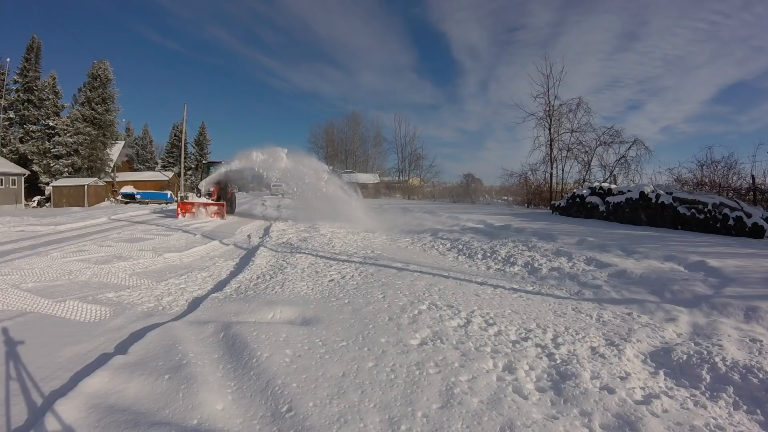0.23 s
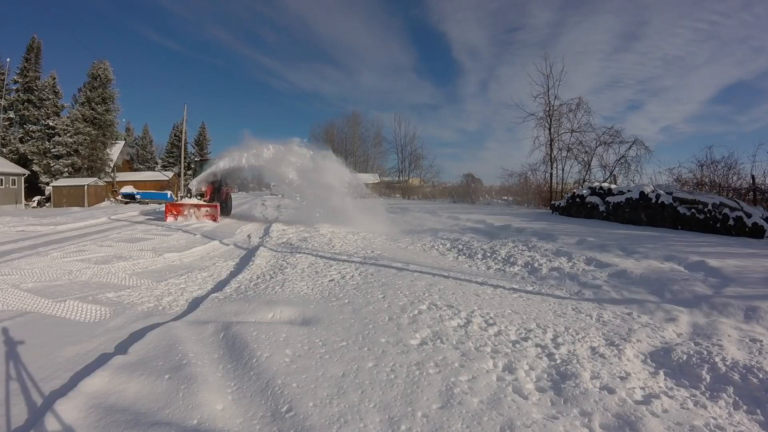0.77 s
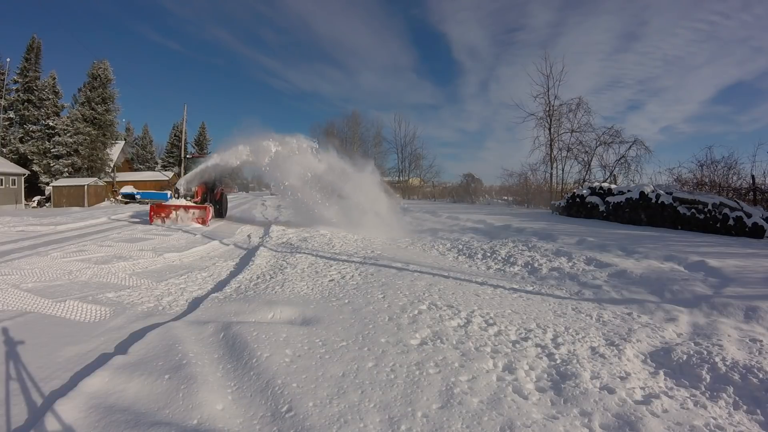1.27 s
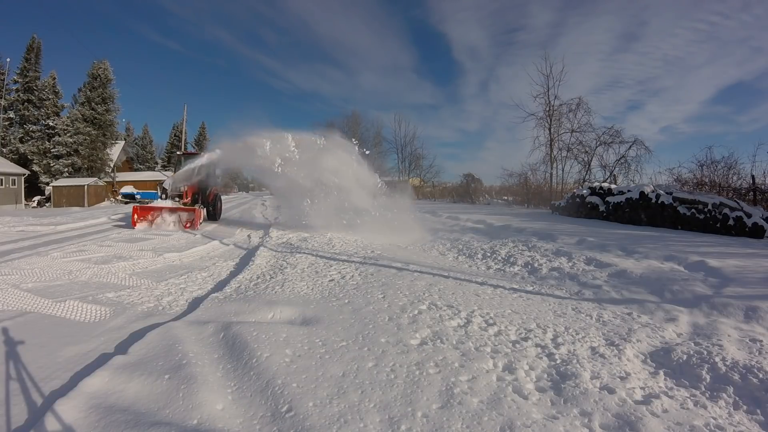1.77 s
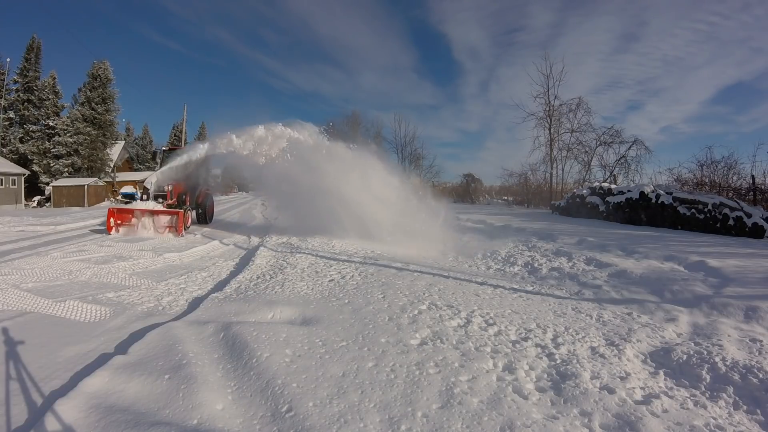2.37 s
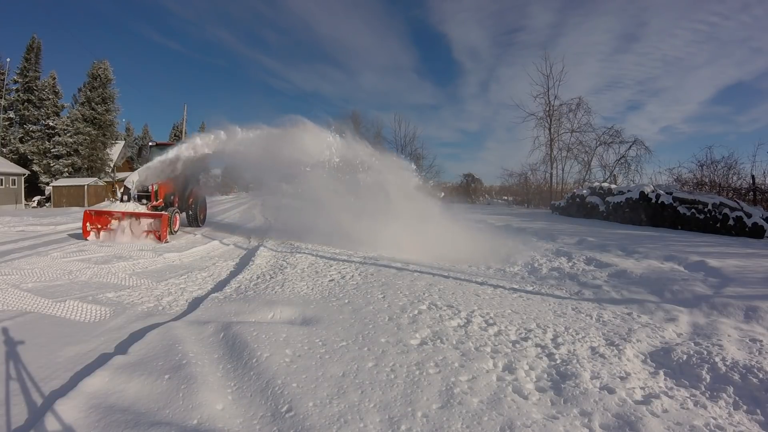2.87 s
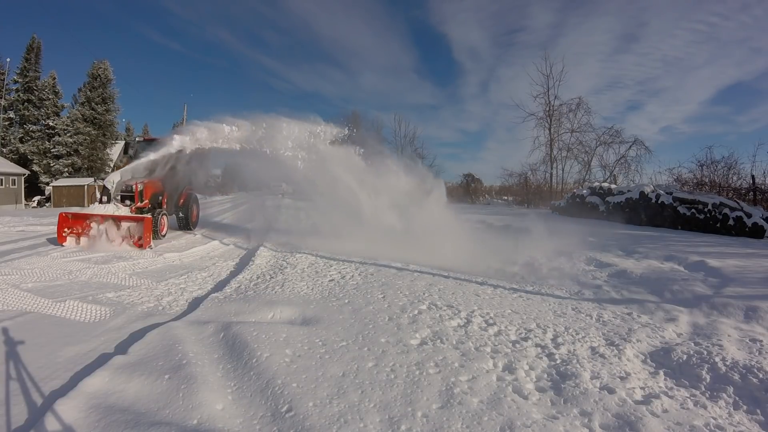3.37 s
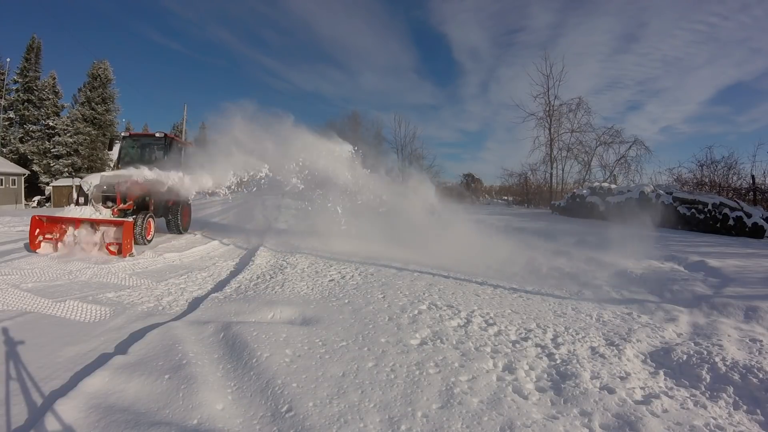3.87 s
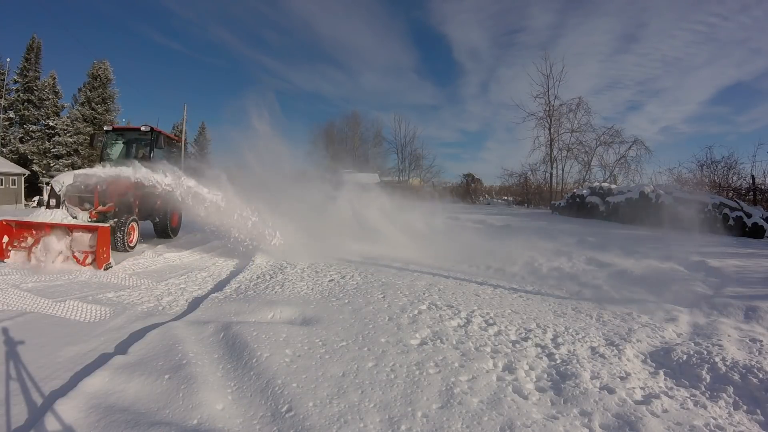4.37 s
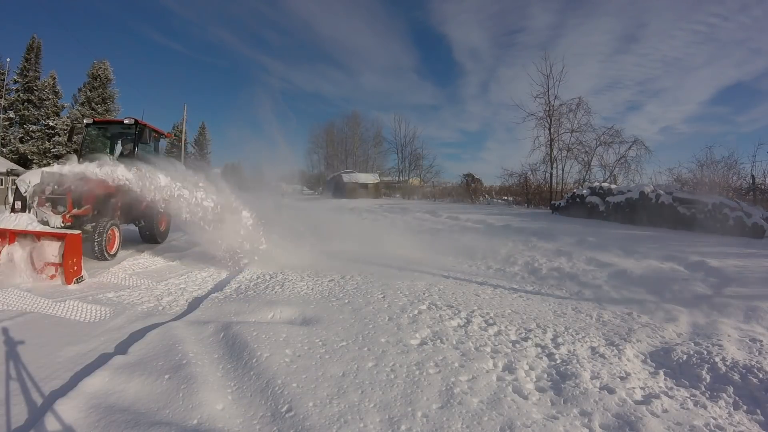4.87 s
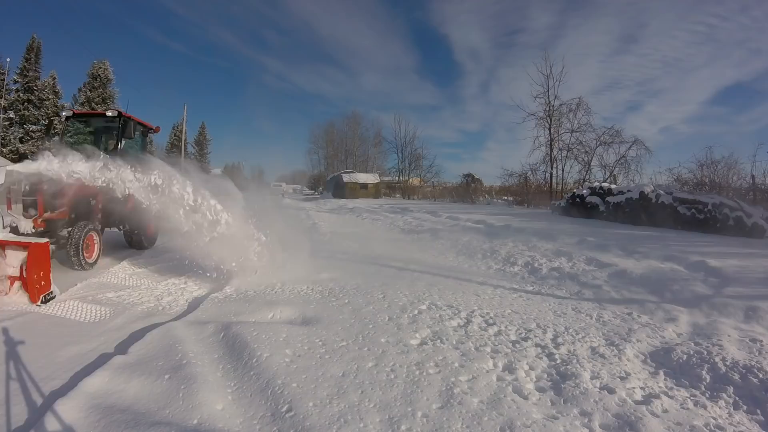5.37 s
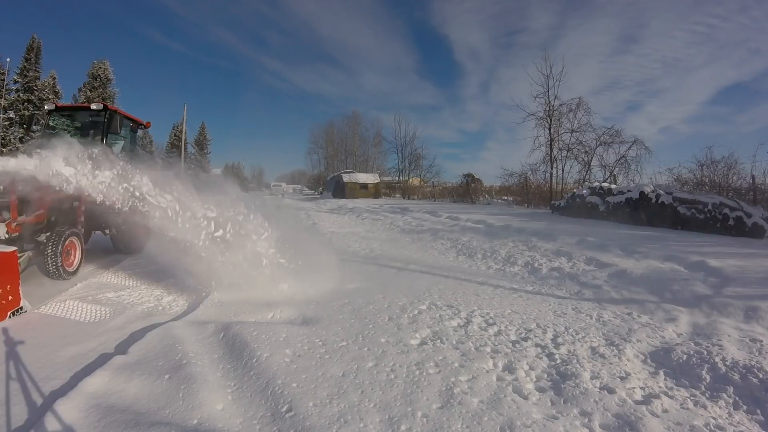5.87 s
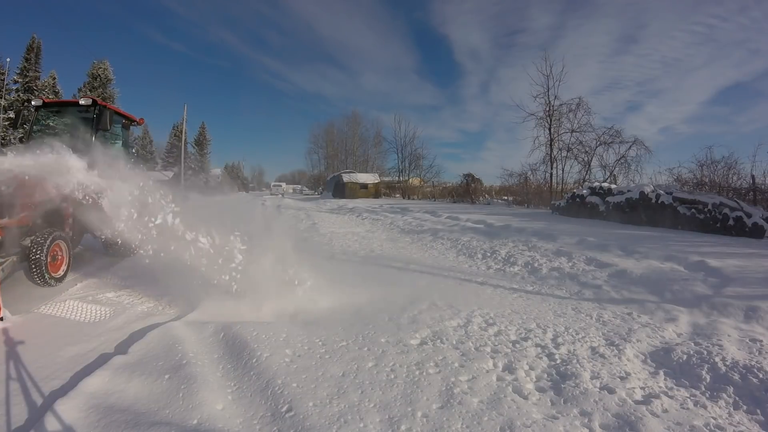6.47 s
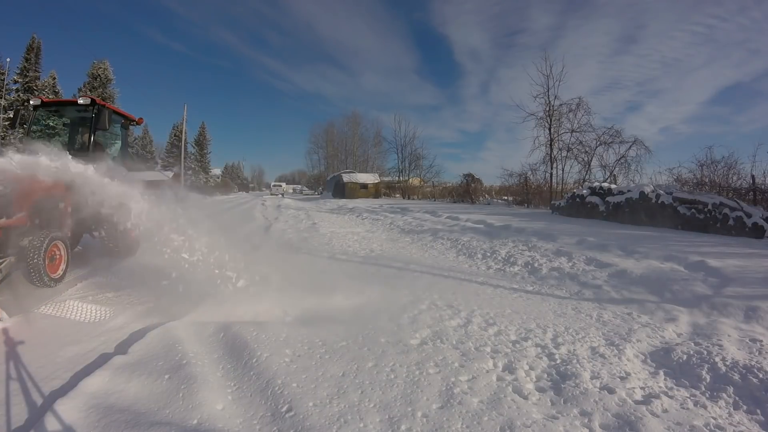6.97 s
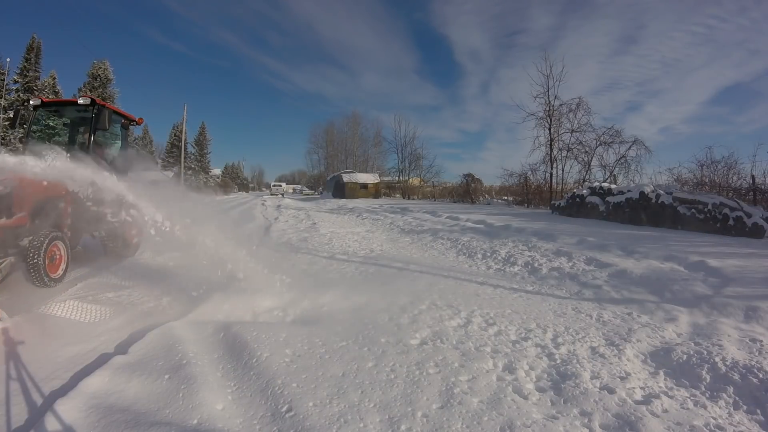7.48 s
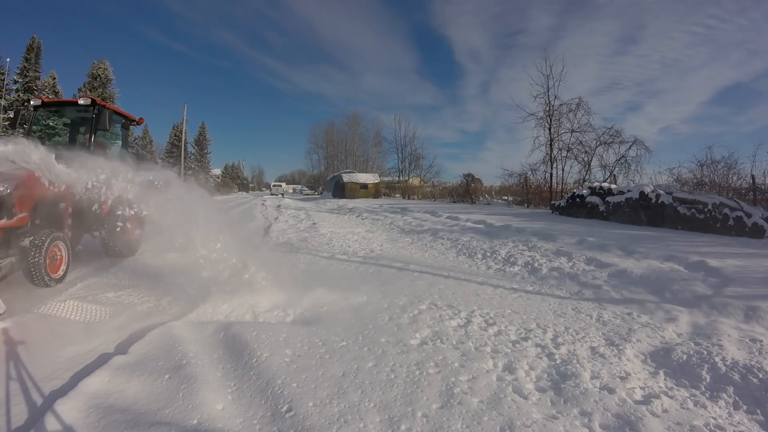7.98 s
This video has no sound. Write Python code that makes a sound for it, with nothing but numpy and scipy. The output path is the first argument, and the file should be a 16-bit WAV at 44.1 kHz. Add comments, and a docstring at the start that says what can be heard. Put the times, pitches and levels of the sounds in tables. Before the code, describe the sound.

A working tractor snowblower drives steadily nearer across open snow. Its low diesel chug, gritty chute hiss, auger churning and wavering hum build continuously, the engine dipping under load. Knocks turn into a nasal, pulsing whine through the microphone's resonant enclosure, peaking near the close pass. Soft gusts brush the microphone, and near the end landing snow makes low thumps and dull patter while the whine fades but the machine keeps running.

```python
"""A low diesel throb and roar come first, under a light breeze: a tractor nears through deep snow and passes close.
Its front blower throws a plume; spreading loss and hand-drawn levels shape the layers, and drifts slow the engine.
Each firing excites exhaust, block, piston and injector; the impeller hums and the flow of snow modulates a hiss.
At last snow thuds and patters down nearby. The microphone's closed housing resonates near 1750 Hz and
turns the knocks into a hard, pulsing whine. Levels are those before this housing."""
import sys
import numpy as np
from scipy import signal
from scipy.fft import rfft, irfft
from scipy.io import wavfile
from scipy.ndimage import map_coordinates

SR = 44100
rng = np.random.default_rng(int(sys.argv[2]) if len(sys.argv) > 2 else 0)


def transcribe(signal):
    """Save signal, clipped to [-1, 1], as a 16-bit WAV file at the path in sys.argv[1]."""
    frames = np.atleast_2d(signal).T
    limited = np.clip(frames, -1, 1)
    pcm = np.round(limited * 32767).astype(np.int16)
    wavfile.write(sys.argv[1], SR, pcm)


N = 363384


def amp(db):
    """Decibel definition: a level becomes an amplitude ratio."""
    return 10 ** (np.asarray(db) / 20)


def unit(x):
    """Normalisation: scale to rms 1."""
    return x / np.sqrt(np.mean(x ** 2) + 1e-20)


def seconds():
    """Sampling: the time of every sample in seconds."""
    return np.arange(N) / SR


def curves(rows):
    """Linear interpolation: one value per sample for each column after the time."""
    times, *columns = np.transpose(rows)
    return [np.interp(seconds(), times, column) for column in columns]


def wobble(rate):
    """Band-limited fluctuation: a smooth random curve with rate knots a second."""
    knots = rng.standard_normal(int(N * rate / SR) + 4)
    return map_coordinates(knots, [np.arange(N) * rate / SR])


def swell(start, length):
    """Raised-cosine window: a smooth rise from 0 to 1 and back."""
    return np.sin(np.pi * np.clip((seconds() - start) / length, 0, 1)) ** 2


def along(points):
    """Logarithmic frequency axis: (f/Hz, level/dB) points joined into a function of frequency."""
    f, db = np.transpose(points)
    return lambda hz: np.interp(np.log(hz + 1), np.log(f + 1), db)


def coloured(x, db_of_hz, size=16384):
    """Minimum phase: a causal filter of the given gain rings after a blow, never before."""
    log_gain = np.log(amp(db_of_hz(np.fft.rfftfreq(size, 1 / SR))))
    cepstrum = irfft(log_gain)
    # folding the cepstrum onto positive time makes the response causal
    cepstrum[1:size // 2] *= 2
    cepstrum[size // 2 + 1:] = 0
    response = irfft(np.exp(rfft(cepstrum)))
    return signal.fftconvolve(x, response)[:N]


def noise(spectrum, gate=1):
    """Source and filter: noise gated at its source, then coloured and scaled to rms 1."""
    return unit(coloured(gate * rng.standard_normal(N), along(spectrum)))


def decaying_sine(t, hz, db, t60):
    """Free vibration: a damped mode loses 60 dB in t60 seconds."""
    return amp(db - 60 * t / t60) * np.sin(2 * np.pi * hz * t)


def dying(blows, t60, delay=0):
    """Exponential decay: an envelope jumps up after each blow, then dies away."""
    t = np.arange(SR // 20) / SR
    decay = (t >= delay) * amp(-60 * np.abs(t - delay) / t60)
    return signal.fftconvolve(blows, decay)[:N]


def strikes(per_s, scatter_db):
    """Random arrivals: impulses at chance times, mostly small and a few large."""
    arrivals = rng.random(N) < per_s / SR
    return arrivals * amp(scatter_db * np.minimum(rng.exponential(size=N), 3))


# spectrum of the breeze at the microphone: f/Hz, level/dB (relative, per Hz)
BREEZE_SPECTRUM = [(5, -3.5), (15, -2), (30, -4), (55, -15.5), (130, -16.5), (400, -60), (2000, -83)]
# gusts: start t/s, length t/s, added level/dB
BREEZE_GUSTS = [(3.95, 0.7, 8), (5.75, 0.45, 6), (6.7, 0.42, 8.5)]
BREEZE_DB = -50


def wind():
    """Flow noise: a light breeze brushes the microphone, with a few gusts."""
    gusts_db = sum(db * swell(start, length) for start, length, db in BREEZE_GUSTS)
    return amp(BREEZE_DB + gusts_db + 1.1 * wobble(9.0)) * noise(BREEZE_SPECTRUM)


# patter of snow clods on the ground: f/Hz, level/dB (relative, per Hz)
CLOD_SPECTRUM = [(80, -12), (200, -2), (450, -2), (700, -5), (1100, -16), (1500, -3.5), (2000, -18),
                 (3500, -13), (7000, -26), (12000, -69)]
CLODS = (7.44, 1.75, -46.5)  # start t/s, length t/s, level/dB
CLODS_PER_S, CLOD_T60_S, CLOD_SCATTER_DB = 300, 0.028, 1.8


def clods():
    """Random impacts: lumps of snow hit the ground, each a short dull puff."""
    start, length, db = CLODS
    puffs = dying(strikes(CLODS_PER_S, CLOD_SCATTER_DB), CLOD_T60_S)
    return amp(db) * swell(start, length) * noise(CLOD_SPECTRUM, puffs)


# thudding of the landing plume: f/Hz, level/dB (relative, per Hz)
THUD_SPECTRUM = [(30, -32), (55, -1), (85, 3), (125, -3.5), (200, -14), (500, -38), (2000, -92)]
# heaviest lumps: t/s, f/Hz, level/dB (before onset and decay)
HEAVY_LUMPS = [(6.906, 50, -33), (7.410, 75, -25), (7.562, 62, -27), (7.646, 70, -24), (7.772, 150, -27),
               (7.842, 90, -33)]
LANDING = (6.57, 1.3, -45.5)  # start t/s, length t/s, level/dB
LUMP_CYCLES = 1  # decay constant in cycles


def landing():
    """Impact on a soft ground: the plume rumbles down close by; the heaviest lumps thud as damped sines."""
    start, length, db = LANDING
    out = np.sqrt(swell(start, length)) * amp(db + 1.1 * wobble(32)) * noise(THUD_SPECTRUM)
    for onset_s, hz, lump_db in HEAVY_LUMPS:
        cycles = np.maximum(seconds() - onset_s, 0) * hz
        envelope = (1 - np.exp(-cycles / 0.34)) * np.exp(-cycles / LUMP_CYCLES)
        out = out + amp(lump_db) * envelope * np.sin(2 * np.pi * cycles)
    return out


# straight drive past the listener: closest distance, its moment and the speed
CLOSEST_M, CLOSEST_S, DRIVE_M_PER_S = 6.22, 7.35, 1.89


def closeness():
    """Pass-by geometry: closest distance over present distance, 1 at the closest point."""
    travelled_m = DRIVE_M_PER_S * (seconds() - CLOSEST_S)
    return CLOSEST_M / np.hypot(CLOSEST_M, travelled_m)


def nearness_db():
    """Spherical spreading: level relative to the closest point."""
    return 20 * np.log10(closeness())


def facing(table, lateness):
    """Directivity: head-on and side-on spectra with their shares; the side takes over as the tractor draws level."""
    side = np.clip(closeness() ** lateness, 0, 1)
    rows = np.asarray(table)
    return [(rows[:, [0, 1]], 1 - side), (rows[:, [0, 2]], side)]


# drifts the auger bites into: start t/s, length t/s, sag in firings/s
SNOW_DRIFTS = [(-0.73, 3.13, 0.71), (1.24, 0.76, 1.25), (1.88, 1.18, 1.07), (3.17, 0.92, 1.37),
               (3.49, 2.06, 0.5), (5.21, 0.8, 0.26), (7.6, 0.7, 1.0)]


def sag():
    """Load on the engine: its speed sinks smoothly in each drift and recovers; overlapping drifts add."""
    return sum(depth * swell(start, length) for start, length, depth in SNOW_DRIFTS)


# the chute swings round and its mouth faces the listener for a while: start t/s, length t/s
SWING = (1.45, 5.1)


def level(law, load):
    """Level law: distance, load and aim of the chute add in decibels.

    Law: level/dB when closest and running free, dB per dB of nearness,
    dB per firing/s of sag, dB more with the chute facing the listener."""
    closest_db, per_nearness, per_sag, facing_db = law
    return closest_db + per_nearness * nearness_db() + per_sag * load + facing_db * swell(*SWING)


# steel struck by a stone: f/Hz, level/dB (before the onset), t60 t/s
CLINK_MODES = [(900, -41, 0.035), (1290, -44, 0.05), (1370, -25.5, 0.03)]
CLINK_S = 1.190


def clink():
    """Modal ringing: a stone in the blower strikes the steel and rings it briefly."""
    t = np.maximum(seconds() - CLINK_S, 0)
    onset = 1 - np.exp(-t / .004)
    return onset * sum(decaying_sine(t, hz, db, t60) for hz, db, t60 in CLINK_MODES)


SLUGS = (1, 1, 0.24)  # dB once a turn, dB twice a turn, growth per firing/s of sag
SURGE_DB, CYLINDERS = 0.86, 4  # swing with each engine cycle, of one firing per cylinder


def feed(turns, cycle, load):
    """Periodic flow in dB: a strong and a weak slug each impeller turn, deeper under load, plus an engine surge."""
    once_db, twice_db, per_sag = SLUGS
    slugs = once_db * np.cos(2 * np.pi * turns) + twice_db * np.cos(4 * np.pi * turns)
    surge = np.cos(2 * np.pi * (cycle + .5) / CYLINDERS)
    return (1 + per_sag * load) * slugs + SURGE_DB * surge + 0.68 * wobble(30)


# hiss of snow in the chute: f/Hz, level/dB (relative, per Hz)
SNOW_SPECTRUM = [(1000, -11), (3000, 3), (4300, 1.5), (5200, -7), (6800, -4.5), (7600, -7), (9000, -20.5),
                 (11400, -18), (12000, -30), (13400, -48)]
# steel panels of the chute: f/Hz, level/dB (relative), t60 t/s
PANEL_MODES = [(2700, -5, 0.019), (2963, -2.5, 0.038), (3310, -2.5, 0.018), (3580, 0.5, 0.024),
               (3890, -2, 0.027)]
GRIT_PER_S, GRIT_SCATTER_DB = 160, 4.5
HISS_LEVEL = (-52.5, 1.5, -0.1, 0.5)
GRIT_LEVEL = (-57.5, 0.9, -1.5, 4.5)


def chute(load, feed_db):
    """Friction and modal ringing: snow hisses along the steel slug by slug, and icy grit rings the panels."""
    hiss = amp(level(HISS_LEVEL, load)) * noise(SNOW_SPECTRUM, amp(feed_db))
    t = np.arange(SR // 20) / SR
    grit = 0
    for hz, db, t60 in PANEL_MODES:
        hits = strikes(GRIT_PER_S, GRIT_SCATTER_DB) * amp(feed_db)
        grit = grit + signal.fftconvolve(hits, decaying_sine(t, hz, db, t60))[:N]
    return hiss + amp(level(GRIT_LEVEL, load)) * unit(grit)


# resonances of the blower's body: start t/s, length t/s, level/dB, f/Hz, half-width f/Hz
BODY_GROANS = [(-1.45, 4.3, -62, 2530, 120), (0.4, 2.4, -57, 267, 40), (4.0, 0.78, -51, 182, 50)]


def groans():
    """Friction-driven resonance: packed snow rubs the blower's body and excites narrow bands of noise."""
    out = 0
    for start, length, db, hz, width_hz in BODY_GROANS:
        band = [(hz / 2, -50), (hz - width_hz, -15), (hz, 0), (hz + width_hz, -15),
                (hz * 2, -60), (SR / 2, -100)]
        out = out + amp(db) * swell(start, length) * noise(band)
    return out


# level of the impeller's hum: t/s, level/dB
HUM_LEVEL = [(0, -54), (0.27, -48), (0.72, -57), (1.3, -50.5), (1.7, -60), (2.15, -47), (2.32, -47.5),
             (2.5, -56), (2.7, -46.5), (3.3, -44.5), (3.62, -55), (4.15, -43), (4.33, -49), (4.6, -43.5),
             (5.0, -45.5), (5.35, -42.5), (5.7, -44), (6.3, -39.5), (6.85, -41.5), (7.5, -38.5), (7.8, -41),
             (8.02, -48.5), (8.24, -39.5)]
# overtones of the hum: multiple of the shaft rate, level/dB (relative)
HUM_ORDERS = [(6, -1), (12, -12.5), (18, -19), (20, -19.5)]
# blower casing: f/Hz, level/dB (relative, per Hz)
CASING_SPECTRUM = [(25, -12), (50, -2), (80, 0.5), (120, -3), (190, -7.5), (400, -41), (2000, -92)]
# snow in the auger: f/Hz, level/dB (relative, per Hz)
AUGER_SPECTRUM = [(80, -21), (170, 0.5), (260, -1), (430, -2), (620, -9.5), (1300, -41.5), (6000, -69)]
SHUDDER_LEVEL = (-56, 0.5, 0, 7)
RUMBLE_LEVEL = (-47.5, 1, -0.1, 0.5)
CHURN_LEVEL = (-47.5, 1.3, 0, -0.5)
# heavy snow packs the auger, which churns harder: start t/s, length t/s, added level/dB
PACKING = (4.1, 0.57, 1.3)


def blower(turns, load):
    """Shaft orders: the impeller hums from six times a turn up, the frame shudders at three; auger and casing rumble."""
    hum_db, = curves(HUM_LEVEL)
    phase_drift = 0.2 * wobble(3.2)
    hum = 0
    for order, db in HUM_ORDERS:
        phase = 2 * np.pi * round(order) * turns + phase_drift + rng.uniform(0, 2 * np.pi)
        hum = hum + amp(db + 0.85 * wobble(5.5)) * np.sin(phase)
    third_order = unit(np.sin(2 * np.pi * 3 * turns))
    shudder = amp(level(SHUDDER_LEVEL, load) + 1.8 * wobble(4.03)) * third_order
    start, length, packing_db = PACKING
    packed_db = packing_db * swell(start, length)
    rumble_db = level(RUMBLE_LEVEL, load) + packed_db + 1.2 * wobble(6.4)
    churn_db = level(CHURN_LEVEL, load) + packed_db + 0.91 * wobble(22)
    rumble = amp(rumble_db) * noise(CASING_SPECTRUM)
    churn = amp(churn_db) * noise(AUGER_SPECTRUM)
    return amp(hum_db) * unit(hum) + shudder + rumble + churn + groans()


def firings(cycle, jitter_s, scatter_db):
    """Jittered pulse train: one impulse per firing; a positive scatter weakens some, a negative one strengthens."""
    beats = np.arange(1, int(cycle[-1]) + 1)
    chance = rng.standard_normal((len(beats), 3))
    at = np.interp(beats, cycle, np.arange(N)) + jitter_s * SR * chance[:, 0]
    strength = amp(-scatter_db * np.hypot(chance[:, 1], chance[:, 2]) ** 2 / 2)
    samples = np.clip(np.round(at), 0, N - 1).astype(int)
    return np.bincount(samples, strength, N)


# modes of the engine block: f/Hz, level/dB (relative), t60 t/s
BLOCK_MODES = [(1270, -11, 0.011), (1777, 4, 0.016), (2656, 3.5, 0.0081)]
BLOCK_DETUNE = 0.016  # standard deviation as a share of the pitch, from blow to blow


def block_ring(blows):
    """Modal ringing: the block rings after each ignition, never at quite the same pitch."""
    t = np.arange(SR // 40) / SR
    at = np.flatnonzero(blows)
    detune = 1 + BLOCK_DETUNE * rng.standard_normal((len(at), len(BLOCK_MODES)))
    rings = sum(decaying_sine(t, hz * detune[:, [k]], db, t60)
                for k, (hz, db, t60) in enumerate(BLOCK_MODES))
    onset = 1 - np.exp(-t / 0.00028)
    rings = rings * onset * blows[at, None]
    samples = at[:, None] + np.arange(len(t))
    # overlapping rings add
    return unit(np.bincount(samples.ravel(), rings.ravel(), N)[:N])


# one exhaust puff through the muffler: f/Hz, head-on level/dB, side-on level/dB (relative)
EXHAUST_SPECTRA = [(20, -14, -30), (47.3, -12, 6.5), (92.7, 5.5, 4.5), (131, -5, -18), (186, -1.5, -2.5),
                   (237, 5, -3.5), (276, -1.5, -8), (324, -2, 1.5), (420.3, 1.5, 1), (484, -9.5, -8.5),
                   (518, -5.5, -8), (595, -18, -9.5), (655, -6, -10), (710, -15, -12), (795, -5, -3.5),
                   (850, -5.5, -13), (895, -3.5, -7), (982, -6, -7), (1190, -11.5, -26.5),
                   (8000, -100, -68)]
EXHAUST_LEVEL = (-42, 1.52, 0.1, 1.5)
# the plume comes between engine and listener and lowers the exhaust: start t/s, length t/s, change/dB
SCREEN = (7.3, 1.08, -4.5)


def exhaust(cycle, load):
    """Pulse and resonator: each firing puffs through the muffler, coloured by the angle of view."""
    puffs = firings(cycle, jitter_s=.00004, scatter_db=-0.2)
    start, length, screen_db = SCREEN
    exhaust_db = level(EXHAUST_LEVEL, load) + screen_db * swell(start, length)
    thumps = sum(share * unit(coloured(puffs, along(spectrum)))
                 for spectrum, share in facing(EXHAUST_SPECTRA, lateness=5.7))
    return amp(exhaust_db) * thumps


# fan and gears: f/Hz, head-on level/dB, side-on level/dB (relative, per Hz)
ROAR_SPECTRA = [(200, -14, -32), (613, 1.5, 2), (940, 3, 0.5), (2090, -4.5, -1), (2870, -1.5, 0.5),
                (3820, -2.5, -8), (4350, -36, -7.5), (7200, -21.5, -34), (13200, -48.5, -86.5)]
ROAR_LEVEL = (-46, 1.06, -0.47, 1.0)


def roar(load, feed_db):
    """Broadband machinery noise: fan and gears, the gears roaring harder under each slug of snow."""
    roar_db = level(ROAR_LEVEL, load) + 0.4 * feed_db + 0.5 * wobble(28)
    # square roots share out power between independent noises
    return amp(roar_db) * sum(np.sqrt(share) * noise(spectrum)
                              for spectrum, share in facing(ROAR_SPECTRA, lateness=4.9))


# diesel knock: t/s, level/dB
KNOCK_LEVEL = [(0, -62.5), (1.0, -60), (1.9, -58), (2.7, -58.5), (3.2, -56), (3.75, -60.5), (4.3, -58.5),
               (5.0, -57), (5.9, -52.5), (6.65, -51), (7.3, -52.5), (7.75, -57), (8.24, -62)]
# injectors, heard best through the grille: f/Hz, level/dB (relative, per Hz)
CLATTER_SPECTRUM = [(1000, -31), (2100, -13), (2550, 1), (3000, -1.5), (3650, 1.5), (4100, -13),
                    (6500, -19.5), (12000, -55)]
CLATTER_T60_S, CLATTER_LEVEL = 0.033, (-59.5, 0.17, -3.5, 1.5)
# the piston slaps just after ignition: delay t/s, t60 t/s, level/dB relative to the knock
SLAP = (0.00097, 0.0091, -5)
RATTLE_T60_S, RATTLE_DB = 0.053, -2.5  # level relative to the knock


def engine(cycle, load, feed_db):
    """Impulsive excitation: each firing puffs, knocks, slaps a piston, clacks an injector and leaves a rattle."""
    knock_db, = curves(KNOCK_LEVEL)
    blows = firings(cycle, jitter_s=0.00009, scatter_db=1.3)
    knock = amp(knock_db) * block_ring(blows)
    delay, slap_t60, slap_db = SLAP
    slap_spectrum = [(200, -15), (600, 5.5), (1200, 5), (1800, -7.5), (3200, -2), (4500, -10), (7000, -37)]
    slap = amp(knock_db + slap_db) * noise(slap_spectrum, dying(blows, slap_t60, delay))
    rattle_spectrum = [(150, -9.0), (400, 1), (1000, -1.5), (1800, 5), (3200, -4.5), (6000, -28), (12000, -72)]
    rattle = amp(knock_db + RATTLE_DB) * noise(rattle_spectrum, dying(blows, RATTLE_T60_S))
    clatter = amp(level(CLATTER_LEVEL, load)) * noise(CLATTER_SPECTRUM, dying(blows, CLATTER_T60_S))
    return exhaust(cycle, load) + knock + slap + rattle + clatter + roar(load, feed_db)


GRAZING = (0.91, 0.83)  # mid-range gain: dB when closest, dB per dB of nearness


def over_snow(x, centre_hz, octaves):
    """Ground interference: the wave grazing soft snow weakens the middle range, less so as the tractor nears."""
    hz = np.fft.rfftfreq(2 * N, 1 / SR)
    bell = np.exp(-(np.log2((hz + 1) / centre_hz) / octaves) ** 2)
    middle = irfft(rfft(x, 2 * N) * bell)[:N]
    closest_db, per_nearness = GRAZING
    return x + (amp(closest_db + per_nearness * nearness_db()) - 1) * middle


GOVERNED_HZ = 47.1  # firings a second without load
FIRINGS_PER_TURN = 4.895  # gearing of the impeller


def scene():
    """Superposition: engine and blower turn together through the drive shaft; snow and wind add near the listener."""
    load = sag()
    cycle = np.cumsum(GOVERNED_HZ - load) / SR + .06  # firings so far
    turns = cycle / FIRINGS_PER_TURN
    feed_db = feed(turns, cycle, load)
    tractor = clink() + chute(load, feed_db) + blower(turns, load) + engine(cycle, load, feed_db)
    ground = over_snow(tractor, centre_hz=820, octaves=0.65)
    return (wind() + clods() + landing() + ground)[None]


# peaks and notches of the microphone's housing: f/Hz, width f/Hz, level/dB
HOUSING_MODES = [(1295, 53, 6), (1475, 16, -13), (1730, 146, 9.5), (2110, 35, -5.5), (2312, 45, -6.5),
                 (2567, 25, -4), (3050, 52, -0.5), (2813, 240, 5.5), (3416, 130, 3), (3740, 27, -5.5),
                 (4670, 50, 4.5), (4765, 157, -5), (5060, 60, 3.5), (5430, 55, 8), (5914, 94, -11.5),
                 (6360, 417, 10), (7080, 140, 1.5), (7500, 77, -8), (8530, 110, -1.5), (8720, 80, 5.5),
                 (9770, 160, -8.5), (10340, 450, 2.5)]
TOP_HZ = 13450  # band limit


def record(dry):
    """Linear filtering: the housing colours everything; the microphone adds faint hiss and limits the band."""
    def housing(hz):
        return sum(db * np.exp(-.5 * ((hz - centre) / width) ** 2) for centre, width, db in HOUSING_MODES)

    inside = coloured(dry[0], housing) + amp(-77.5) * rng.standard_normal(N)
    # a mirrored copy avoids a jump at the ends
    mirrored = np.concatenate([inside, inside[::-1]])
    passed = np.fft.rfftfreq(2 * N, 1 / SR) < TOP_HZ
    return irfft(rfft(mirrored) * passed)[None, :N]


dry = scene()
out = record(dry)
transcribe(out)
```